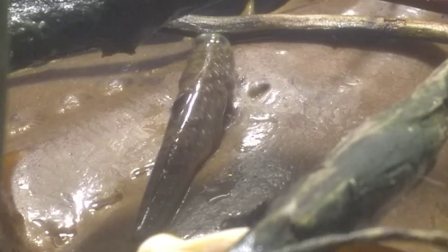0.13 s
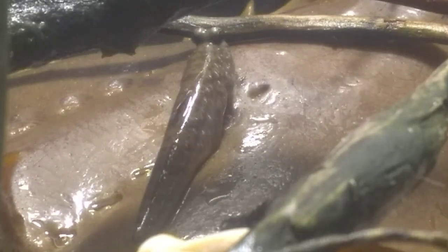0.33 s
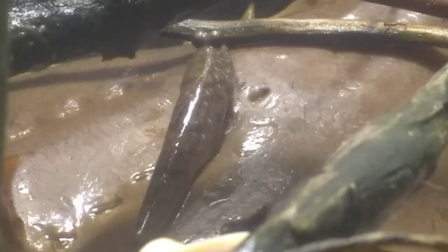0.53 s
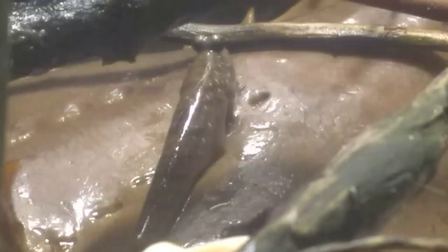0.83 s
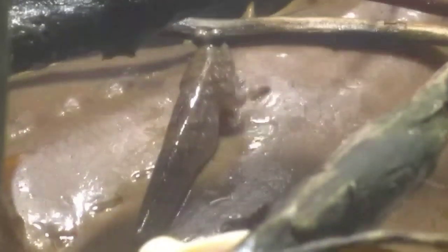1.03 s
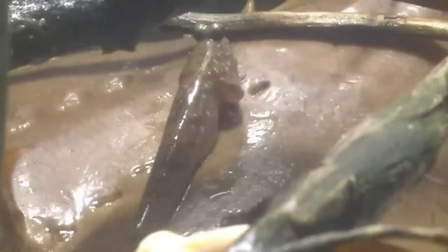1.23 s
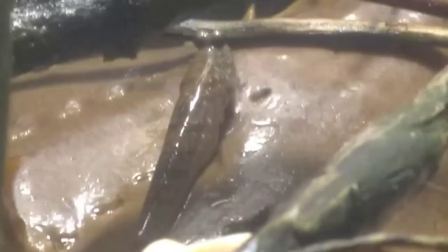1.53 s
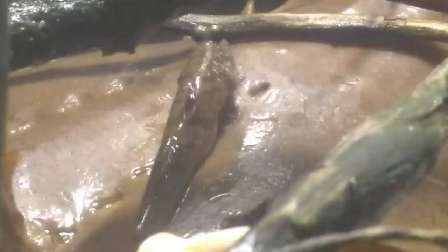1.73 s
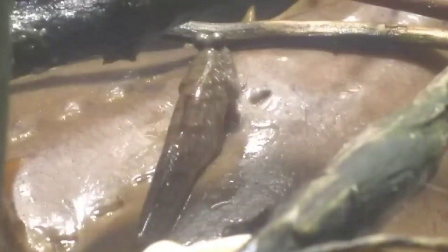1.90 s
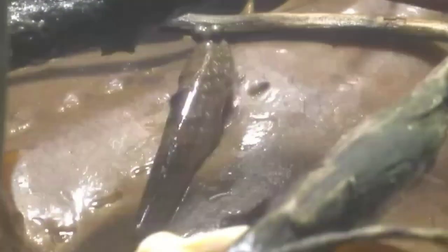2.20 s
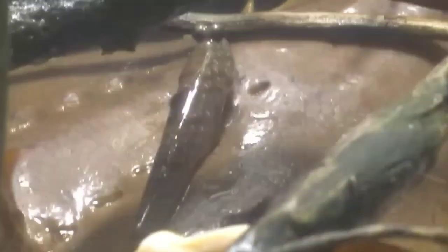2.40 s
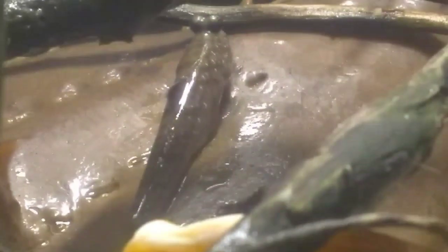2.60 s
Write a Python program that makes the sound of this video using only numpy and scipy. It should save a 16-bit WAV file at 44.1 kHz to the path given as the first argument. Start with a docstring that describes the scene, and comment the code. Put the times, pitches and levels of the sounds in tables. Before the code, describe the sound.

Steady low pump hum, slowly beating, over a soft rush of water with faint bubbling

```python
"""A low, slowly beating hum with a few faint wavering tones over it, in a soft rush of water and air:
a filter pump runs steadily beside an indoor tank. Motor and mains hums are pairs of close sine waves,
the housing's tones are drifting sines, the rush is coloured noise and the bubbles are short decaying rings.
The sound fades in at the start and its stereo image is widened above the bass."""
import sys
import numpy as np
from scipy import signal
from scipy.fft import rfft, irfft
from scipy.io import wavfile
from scipy.ndimage import uniform_filter1d

SR = 44100
rng = np.random.default_rng(int(sys.argv[2]) if len(sys.argv) > 2 else 0)


def generate_wav(sig):
    """Save sig (samples, or channels by samples) to the path in sys.argv[1] as 16-bit PCM at SR."""
    pcm = np.round(np.clip(np.atleast_2d(sig).T, -1, 1) * 32767).astype(np.int16)
    wavfile.write(sys.argv[1], SR, pcm)


N = 121275  # length in samples


def undb(db):
    """Decibels to gain."""
    return 10 ** (np.asarray(db) / 20)


def walk(rate):
    """Smooth random curve: levels held 1 / rate s and slewed twice, with a spread a little under 1."""
    hold = int(SR / rate)
    steps = np.repeat(rng.standard_normal(N // hold + 1), hold)
    slewed = uniform_filter1d(uniform_filter1d(steps, hold), hold)
    return 1.185 * slewed[:N]


def curve(points):
    """A curve over time, joined by straight lines from (time [s], value) points."""
    times, values = np.array(points).T
    return np.interp(np.arange(N) / SR, times, values)


def colour(f, hz, db):
    """Levels in dB at frequencies f, joined by straight lines on a log axis."""
    return np.interp(np.log(f + 1), np.log(hz), db)


def bump(f, hz, width, db):
    """The lift in dB that one resonance gives at frequencies f; half of it is left half a width away."""
    return db / (1 + (2 * (f - hz) / width) ** 4)


def low_pass(sound, hz):
    """The part of a sound below hz, with no shift in time."""
    return signal.sosfiltfilt(signal.butter(2, hz, fs=SR, output="sos"), sound)


def hum(hz, left_db, right_db, lead, waver_db):
    """One steady hum; standing waves give each side its own level and timing."""
    in_step_s = .542  # the moment when shaft and mains are in step
    phase = 2 * np.pi * hz * (np.arange(N) / SR - in_step_s)
    left = undb(left_db + waver_db * walk(5.36)) * np.cos(phase + lead / 2)
    right = undb(right_db + waver_db * walk(4.3)) * np.cos(phase - lead / 2)
    return np.array([left, right]) * np.sqrt(2)  # peak from rms


def motor():
    """The shaft slips a little behind the mains, so the two hums and their doubles beat slowly."""
    shaft_hz, mains_hz = 58.25, 60.02
    # Hums of shaft and mains and their doubles, each one row:
    # (left level [dB], right level [dB], lead of the left [rad], waver [dB])
    shaft = (-44.8, -50.5, 0.2, 1.1)
    mains = (-82, -57.5, 4.5, 6.5)
    shaft_double = (-43.5, -47, 1.5, 0.9)
    mains_double = (-45.5, -40.5, 2.5, -0.24)
    # Level curve laid over the buzz that the two doubles make together: (time [s], level [dB])
    buzz_level = [(.3, 0), (.4, 2.5), (.47, -3), (.54, -3), (.66, -1), (.74, 1), (.84, 1), (1.18, 1),
                  (1.45, -.5), (1.55, 2), (1.62, -9), (1.69, -2), (2.0, -1.5), (2.28, 2), (2.55, 4),
                  (2.75, -2)]
    buzz = hum(2 * shaft_hz, *shaft_double) + hum(2 * mains_hz, *mains_double)
    return hum(shaft_hz, *shaft) + hum(mains_hz, *mains) + buzz * undb(curve(buzz_level))


def housing():
    """The housing sings faint sine tones that waver in level and pitch."""
    # Tones of the housing: (centre frequency [Hz], left level [dB], right level [dB])
    tones = [(149.8, -51.4, -53.2), (273.6, -51, -51.6), (447.2, -50, -52.5), (546.9, -52, -58),
             (1047.7, -60.5, -61), (1221.4, -65, -65.5), (2621, -70.5, -70.5), (2796, -70.5, -70.5)]
    waver_db, drift_hz = 3, 1.1
    out = 0
    for hz, left_db, right_db in tones:
        phase = 2 * np.pi * np.cumsum(hz + drift_hz * walk(9.56)) / SR
        sides = undb([[left_db], [right_db]]) * np.sqrt(2)
        out = out + sides * np.sin(phase) * undb(waver_db * walk(13))
    return out


def rush():
    """Turbulent flow coloured by tank and room; its bands swell together and flicker alone, and the lows churn."""
    # Base spectrum of the flow: (frequency [Hz], centre level [dB per Hz], side level [dB per Hz])
    flow_spectrum = [(21.7, -96, -88), (47.5, -81, -73), (75.5, -82, -81), (95, -73.5, -65),
                     (131, -71.5, -82), (150, -69.5, -69.5), (258, -68.5, -78.5), (427, -67.5, -71.5),
                     (726, -72, -77.5), (1000, -74.5, -78.5), (1348, -73.5, -73.5), (2010, -84.5, -84),
                     (2460, -83, -84), (3440, -90.5, -84.5), (3630, -91, -88.5), (4360, -95, -96),
                     (4960, -99.5, -100), (5600, -99, -101), (6900, -104, -103.5), (9720, -112.5, -112.5),
                     (13100, -121, -123)]
    # Resonances and nulls of tank and room: (frequency [Hz], width [Hz], centre lift [dB], side lift [dB])
    resonances = [(173.8, 18, 6.5, 9.5), (213, 33, 1.5, -3), (240, 6.4, -1.5, 14), (296.8, 11, 8.5, 6),
                  (317, 21, -7, -3), (345, 29.4, 6, -2.5), (392, 14, 5, 2), (427.5, 27, 5, 0.5),
                  (490, 14.5, -5.5, 4), (586, 9.1, 5.5, 2), (707, 19, -1, -10), (728, 18, 4, 4),
                  (790, 6.5, 2.5, 8), (970, 42, 4.5, 5), (1083, 21, 2.5, -5), (1167, 68, -1.5, -6),
                  (1223, 30, 1.5, -4), (1437, 24, 4, -2)]
    # A ring added to the side signal only: (frequency [Hz], width [Hz], lift [dB])
    side_ring = (4000, 190, 6)
    # Lean between the channels: (frequency [Hz], left minus right [dB])
    lean = [(110, 6.5), (180, -2), (260, 4), (480, 5), (800, 1.5), (2000, -1), (5000, -0.2), (9000, -5.5)]
    # Edges of the bands that flicker separately: (frequency [Hz])
    band_edges = [100, 200, 330, 600, 1200, 2400, 4800]
    swell_db, swell_per_s = .5, 8.65
    flicker_db, flicker_per_s = 1.14, 36
    churn_db, churn_per_s, churn_below_hz = 1.5, 30, 470  # the low water surges unevenly

    f = np.arange(N // 2 + 1) * SR / N
    hz, centre_db, sides_db = np.array(flow_spectrum).T
    db = np.array([colour(f, hz, centre_db), colour(f, hz, sides_db) + bump(f, *side_ring)])
    for at_hz, width, centre_lift, side_lift in resonances:
        db = db + bump(f, at_hz, width, np.array([[centre_lift], [side_lift]]))
    noise = rfft(rng.standard_normal((2, N)))
    mid, side = noise * undb(db) * np.sqrt(SR / 2)  # the root sets the noise to unit power per Hz
    lean_db = colour(f, *np.array(lean).T)
    spectrum = np.array([mid + side, mid - side]) * undb(np.array([lean_db, -lean_db]) / 2)

    band = np.searchsorted(band_edges, f)
    swell = swell_db * walk(swell_per_s)
    flow = 0
    for k in range(len(band_edges) + 1):
        flicker = flicker_db * walk(flicker_per_s)
        flow = flow + irfft(spectrum * (band == k), N) * undb(swell + flicker)
    low = low_pass(flow, churn_below_hz)
    return flow - low + low * undb(churn_db * walk(churn_per_s))


def gurgle():
    """Small outflow bubbles half buried in the rush: each rings a few cycles and rises a little in pitch."""
    bubbles_per_s, low_hz, high_hz = 56, 171.8, 1487
    softest_db, spread_db = -46, 2.5  # before panning and the ring's own envelope
    decay_cycles, rise = 5.64, 0.069  # rise: share of the pitch per decay time
    out = np.zeros((2, N))
    for when, pitch, size, place in rng.random((int(bubbles_per_s * N / SR), 4)):
        start = int(when * N)
        hz = low_hz * (high_hz / low_hz) ** pitch
        length = min(SR // 10, N - start)
        age = np.arange(length) * hz / SR / decay_cycles  # in decay times
        envelope = np.exp(-age) - np.exp(-10 * age)
        ring = np.sin(2 * np.pi * decay_cycles * age * (1 + rise * age / 2)) * envelope
        gain = undb(softest_db - spread_db * np.log(1 - .95 * size))  # a few bubbles stand out
        pan = np.sqrt([[.5 + place], [.5 + (1 - place)]])
        out[:, start:start + length] += gain * pan * ring
    return out


def scene():
    """Motor, housing, flow and bubbles fade in; the bass holds back at first, then comes up quickly."""
    # Fade-in of the upper sound: (time [s], gain)
    upper_fade = [(.076, 0), (.079, 0.095), (.125, 0.31), (.19, 0.52), (.26, 0.74), (.33, 0.99)]
    # Fade-in of the bass: (time [s], gain)
    bass_fade = [(.072, 0), (.1, 0.13), (.2, 0.21), (.255, 0.36), (.275, 0.91)]
    bass_below_hz = 197
    sound = motor() + housing() + rush() + gurgle()
    bass = low_pass(sound, bass_below_hz)
    return bass * curve(bass_fade) + (sound - bass) * curve(upper_fade)


def record(dry):
    """Above the bass each channel gets a late, inverted copy of the other; then the top is cut."""
    delay_s, share, from_hz = .000487, 0.62, 920
    top_hz = 14200
    f = np.arange(N + 1) * SR / (2 * N)  # double length, so the late copy cannot wrap round
    cross = share * f ** 4 / (f ** 4 + from_hz ** 4)
    swapped = rfft(dry[::-1], 2 * N)
    late = irfft(swapped * cross * np.exp(-2j * np.pi * f * delay_s))[:, :N]
    top_cut = signal.ellip(10, .2, 70, top_hz, fs=SR, output="sos")
    return signal.sosfilt(top_cut, dry - late)


dry = scene()
out = record(dry)
generate_wav(out)
```